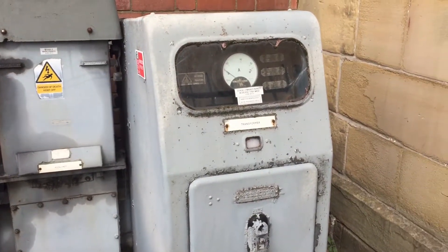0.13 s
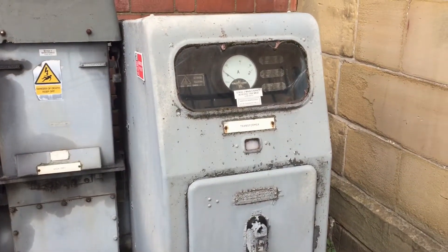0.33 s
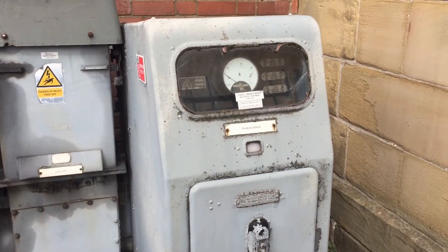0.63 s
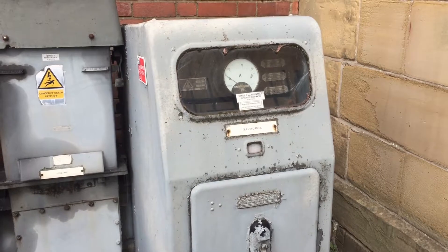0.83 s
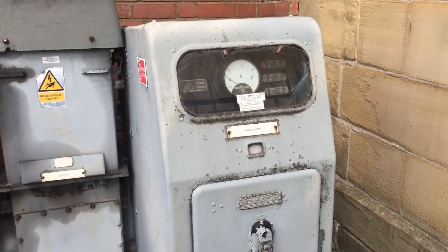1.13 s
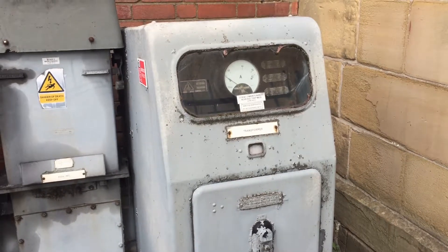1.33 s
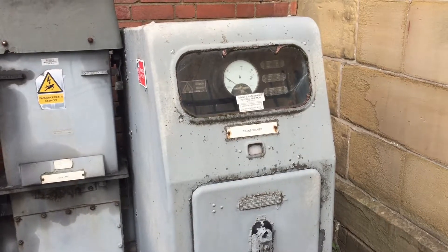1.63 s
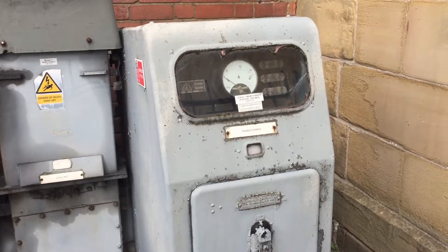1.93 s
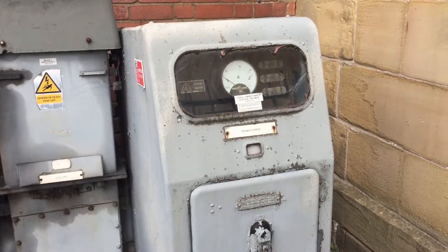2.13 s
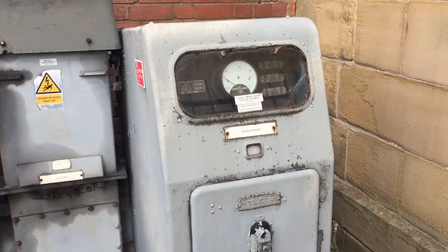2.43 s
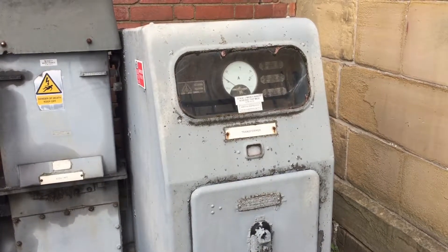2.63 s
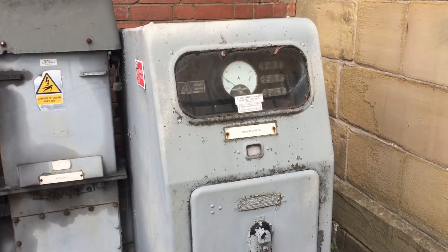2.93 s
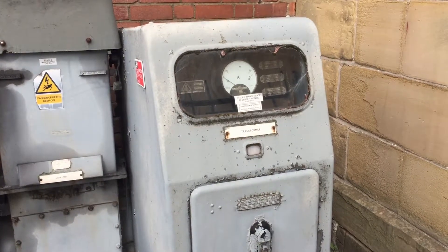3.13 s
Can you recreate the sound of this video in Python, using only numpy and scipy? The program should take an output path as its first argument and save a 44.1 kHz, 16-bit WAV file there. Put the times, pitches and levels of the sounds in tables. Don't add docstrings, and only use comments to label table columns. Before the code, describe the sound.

A quiet low electric hum, around 100 hertz with its multiples, runs throughout from a transformer cabinet outdoors, swelling around 0.5 to 1 second, then wavering and dipping near 2.15. Light wind rumbles, thumping the handheld microphone at the start, near 1 and 2.3. A tiny dry tick falls at 1.05. Distant traffic roars and hisses; an engine fades by 0.9, with faint brake squeaks near 0.05, 0.65 and 1.2.

```python
import sys
import numpy as np
from scipy import signal
from scipy.fft import rfft, irfft
from scipy.io import wavfile
from scipy.ndimage import uniform_filter1d

SR = 44100
rng = np.random.default_rng(int(sys.argv[2]) if len(sys.argv) > 2 else 0)


def dump_mix(stems):
    frames = np.atleast_2d(stems).T
    limited = np.clip(frames, -1, 1)
    pcm = np.round(limited * 32767).astype(np.int16)
    wavfile.write(sys.argv[1], SR, pcm)


def amplitude_ratio(level_db):
    exponent = np.asarray(level_db, float) / 20
    return 10 ** exponent


N = 144648

# pitch_hz, level_db (per Hz)
ROAR_COLOUR = [(20, -3), (200, -2.5), (330, -7.5), (580, -14.5), (920, -9.5), (1500, -16.5), (2100, -26),
               (3200, -47)]


def evened(x):
    return x / np.sqrt(np.mean(x ** 2) + 1e-20)


def along(points):
    return np.interp(np.arange(N) / SR, *np.transpose(points))


def slow(top_hz):
    t = np.arange(N) / SR
    rates_hz = np.geomspace(.3, top_hz, 16)
    return evened(sum(np.sin(2 * np.pi * (f * t + rng.random())) / np.sqrt(f) for f in rates_hz))


def blurred(chance, bins, frames):
    return evened(uniform_filter1d(uniform_filter1d(chance, size=bins, axis=0), size=frames, axis=1))


def noise(points, patchy_db, size=1024, grain_db=0):
    hz = np.fft.rfftfreq(size, 1 / SR)
    real, imaginary, chance = rng.standard_normal((4 * N // size + 5, len(hz), 3)).T
    grain = blurred(chance, bins=2, frames=5)
    patches = blurred(chance, bins=9, frames=12)
    point_hz, point_db = np.transpose(points)
    colour = np.interp(np.log(hz + 1), np.log(point_hz), point_db, left=-60, right=-60)
    gain = amplitude_ratio(colour[:, None] + patchy_db * patches + grain_db * grain)
    sound = signal.istft((real + 1j * imaginary) * gain, nperseg=size, noverlap=size * 3 // 4)[1]
    return evened(sound[:N])


def hum():
    # multiple, level_db (rms), sway_share (0-1)
    multiples = [(1, -55, .6), (2, -53, 1.0), (3, -54.5, .25), (4, -73, .2), (5, -61, .1), (7, -72, .3),
                 (8, -68, .1), (9, -64, 0), (11, -67, 0), (13, -78, 0), (19, -82, 0), (21, -78, 0),
                 (23, -88, 0), (26, -89, 0), (27, -83, 0), (29, -91, 0), (37, -93, 0), (40, -92.5, 0),
                 (42, -96, 0)]
    # time_s, level_db
    hand_sway = [(0, -7), (.12, -6), (.34, -1), (.45, 5.5), (1.05, 5), (1.17, -7), (1.3, 4), (1.52, -5),
                 (1.72, 2), (1.84, 1.5), (1.93, -6.5), (2.15, -26), (2.4, -4.5), (2.6, -4), (2.78, 1),
                 (2.93, -6.5), (3.1, -1.5), (3.28, 0.1)]
    # multiple, throbs_per_s, crest_s, depth_db
    throbbing = (3, 3.6, 1.0, 4)
    throbbing_multiple, throbs_per_s, crest_s, depth_db = throbbing
    core_hz, drift_hz_per_s, waver_db = 100.035, .009, 2.1
    t = np.arange(N) / SR
    sway_db = along(hand_sway)
    turns = core_hz * t + drift_hz_per_s * t ** 2 / 2
    throb_db = depth_db * np.cos(2 * np.pi * throbs_per_s * (t - crest_s))
    out = np.zeros(N)
    for multiple, db, share in multiples:
        level_db = db + share * sway_db + waver_db * slow(top_hz=21.86)
        if multiple == throbbing_multiple:
            level_db = level_db + throb_db
        tone = np.sin(2 * np.pi * (multiple * turns + rng.random()))
        out += np.sqrt(2) * amplitude_ratio(level_db) * tone
    return out


def wind():
    # pitch_hz, level_db (per Hz)
    rumble_colour = [(25, -33), (45, 4.5), (70, 7), (110, -10.5), (170, -10), (260, -23.5), (400, -48)]
    # time_s, level_db (rms)
    gusts = [(0, -52), (.14, -48), (.22, -52), (.31, -47), (.4, -58), (.6, -49), (.75, -49), (.9, -50),
             (1.1, -43), (1.22, -54), (1.6, -53), (1.95, -49.5), (2.15, -45.5), (2.27, -51), (2.45, -48),
             (2.67, -52), (2.88, -48.5), (3.28, -55)]
    # time_s, peak_db, pitch_hz, length_cycles
    eddies = [(0.02, -27, 85, 1), (0.034, -28, 96, 0.41), (.070, -28.5, 120, 1), (.091, -35, 60, 0.83),
              (.108, -29, 51, 0.9), (0.31, -35.5, 70, 0.76), (0.456, -35, 129, .7), (.55, -40, 120, 0.53),
              (0.824, -36.5, 90, 0.6), (0.864, -39, 100, 0.64), (.948, -36, 130, 0.53),
              (1.024, -30, 82, 0.28), (1.081, -36, 110, 0.34), (2.75, -47, 120, .6), (2.89, -38, 75, .8),
              (3.216, -36, 80, 0.43), (2.3044, -31, 288, 0.98), (2.333, -40, 229, 0.57),
              (2.315, -31, 118, 0.99), (2.325, -32, 110, 0.51), (2.339, -21.5, 100, 0.49)]
    sag, rise_cycles = 0.28, 0.43
    t = np.arange(N) / SR
    strength_db = along(gusts) + 2.2 * slow(top_hz=24.2)
    out = amplitude_ratio(strength_db) * noise(rumble_colour, patchy_db=3.5, size=4096)
    for start_s, db, hz, cycles in eddies:
        u = (t - start_s) * hz
        swell = np.exp(-(u / np.where(u < 0, rise_cycles, cycles)) ** 2)
        out += 0.86 * amplitude_ratio(db) * swell * np.sin(2 * np.pi * (u - sag * u ** 2 / (1 + abs(u))))
    return out


def tick():
    # pitch_hz, level_db, t60_s (fall by 60 dB)
    modes = [(3560, -53.5, .018), (4300, -60, .004), (4900, -60.5, .005), (5600, -60.5, .005),
             (6600, -61, .013)]
    u = np.maximum(np.arange(N) / SR - 1.0533, 0)
    return sum(amplitude_ratio(db - 60 * u / t60) * np.sin(2 * np.pi * hz * u) for hz, db, t60 in modes)


def traffic():
    # pitch_hz, level_db (per Hz)
    hiss_colour = [(1500, -19.5), (2300, -1), (2750, -2.5), (3050, -5.5), (4980, -13), (5780, -13.5),
                   (10500, -19.5), (16500, -24.5)]
    roar_db = -49.5 + 2.0 + .5 * slow(top_hz=2.81)
    roar = amplitude_ratio(roar_db) * noise(ROAR_COLOUR, patchy_db=1.5, size=2048, grain_db=1.76)
    hiss = amplitude_ratio(-69.5) * noise(hiss_colour, patchy_db=0.6, size=512, grain_db=1.5)
    return roar + hiss


def engine():
    # start_s, length_s, level_db (rms), pitch_hz, width_hz
    far_pass = (-0.1, 1, -54.5, 141.5, 29.5)
    start_s, length_s, db, hz, width_hz = far_pass
    t = np.arange(N) / SR
    fuzz = noise([(hz - width_hz, -20), (hz, 0), (hz + width_hz, -20)], patchy_db=2.5, size=4096)
    swell = np.sqrt(abs(np.sin(np.pi * np.clip((t - start_s) / length_s, 0, 1))))
    return amplitude_ratio(db) * swell * fuzz


def tyre_whines():
    whines_per_s, base_db, low_hz, high_hz = 120, -57, 499.2, 3590
    roar_hz, roar_db = np.transpose(ROAR_COLOUR)
    out, t = np.zeros(N), np.arange(SR // 8) / SR
    for place, height, luck, bend in rng.random((round(whines_per_s * N / SR), 4)):
        hz = low_hz * (high_hz / low_hz) ** height
        v = np.minimum(t / (0.027 + 0.05 * bend), 1)
        db = base_db + np.interp(np.log(hz), np.log(roar_hz), roar_db) - roar_db[4]
        db = db + 5.9 * height ** 2 - 1.96 * np.log(luck)
        glide = 1 + 0.044 * (bend - .5) * t
        whine = amplitude_ratio(db) * np.sin(np.pi * v) ** 2 * np.sin(2 * np.pi * hz * t * glide)
        part = out[int(place * N):][:len(t)]
        part += whine[:len(part)]
    return out


def brake_squeaks():
    # start_s, length_s, level_db, pitch_hz
    squeaks = [(.022, .028, -65, 2770), (.045, .042, -62, 2790), (.085, .03, -69, 2810),
               (.64, .025, -65, 2680), (1.17, .03, -62, 2090), (1.232, .036, -56.5, 2110),
               (1.195, .03, -65, 2370), (1.305, .035, -65, 2700)]
    rise_hz = 70
    t, out = np.arange(N) / SR, np.zeros(N)
    for start_s, length_s, db, hz in squeaks:
        v = np.clip((t - start_s) / length_s, 0, 1)
        turns = hz * t + rise_hz * length_s * (v ** 2 - v) / 2
        out += amplitude_ratio(db) * np.sin(np.pi * v) ** 2 * np.sin(2 * np.pi * turns)
    return out


def scene():
    near = hum() + wind() + tick()
    far = traffic() + engine() + tyre_whines() + brake_squeaks()
    return (near + far)[None]


def band_limit(x):
    return signal.sosfilt(signal.butter(12, 15690, fs=SR, output="sos"), x)


def record(dry):
    # pitch_hz, width_hz, level_db
    port_dips = [(4910, 220, -3), (7630, 570, -2), (10400, 470, -3.5)]
    low_cut_hz, margin = 46, SR // 4
    wide = np.pad(dry, ((0, 0), (margin, margin)), mode="reflect", reflect_type="odd")
    size = wide.shape[1]
    hz = np.fft.rfftfreq(size, 1 / SR)
    colour_db = sum(db * np.exp(-((hz - f) / width_hz) ** 2) for f, width_hz, db in port_dips)
    colour_db = colour_db - 10 * np.log10(1 + (low_cut_hz / (hz + 1)) ** 6)
    mix = irfft(rfft(wide) * amplitude_ratio(colour_db), size)[:, margin:margin + N]
    return band_limit(mix)


dry = scene()
out = record(dry)
dump_mix(out)
```